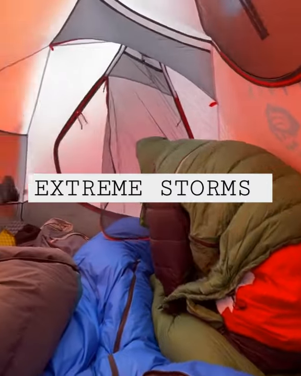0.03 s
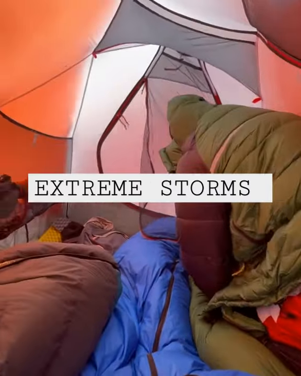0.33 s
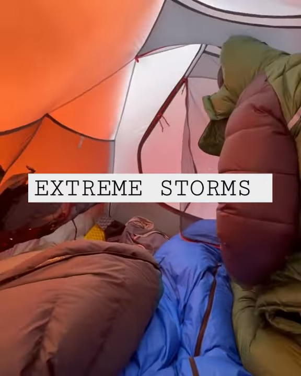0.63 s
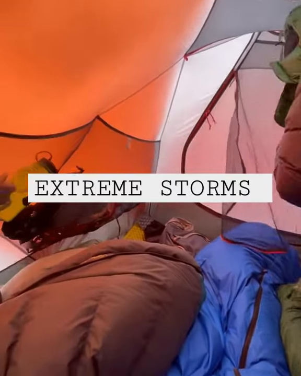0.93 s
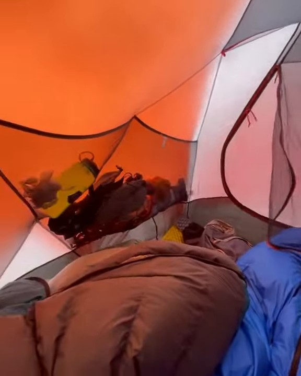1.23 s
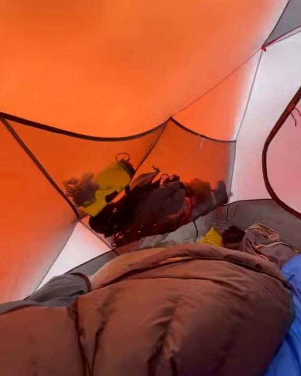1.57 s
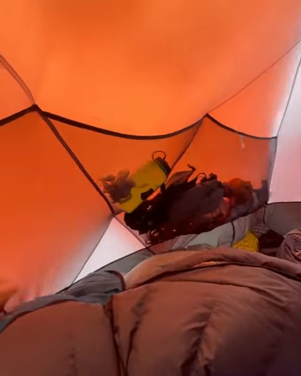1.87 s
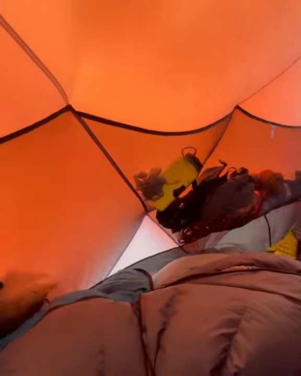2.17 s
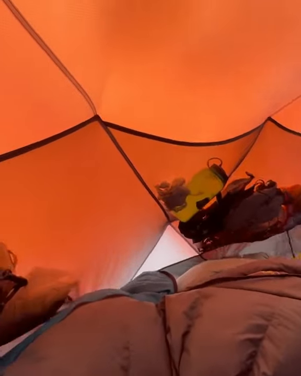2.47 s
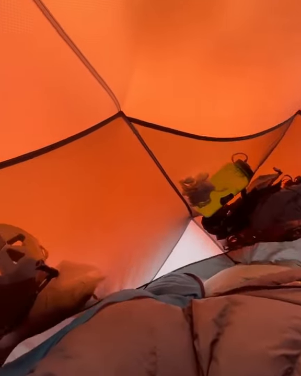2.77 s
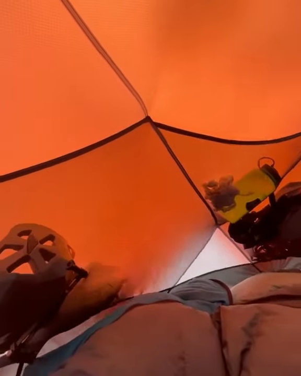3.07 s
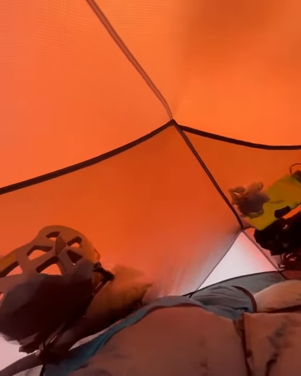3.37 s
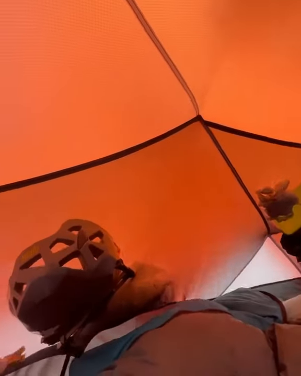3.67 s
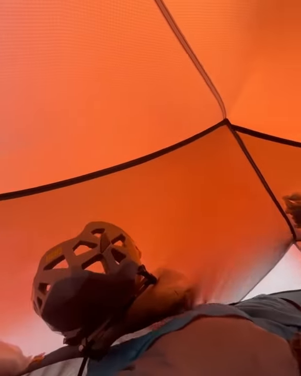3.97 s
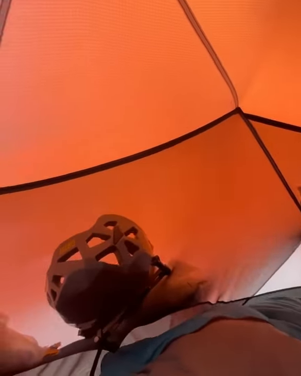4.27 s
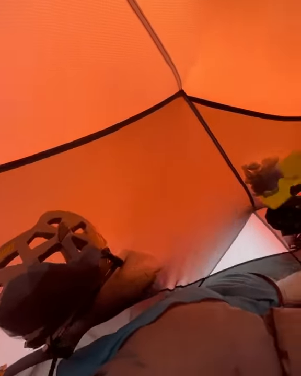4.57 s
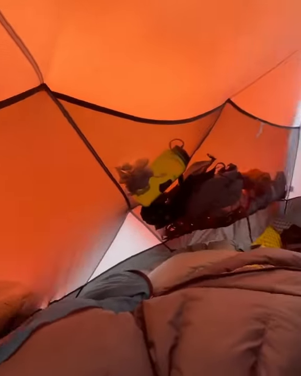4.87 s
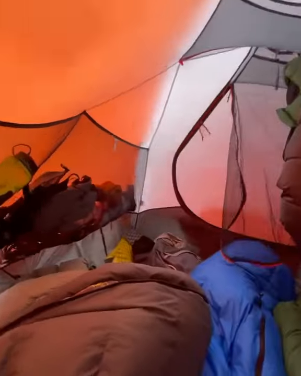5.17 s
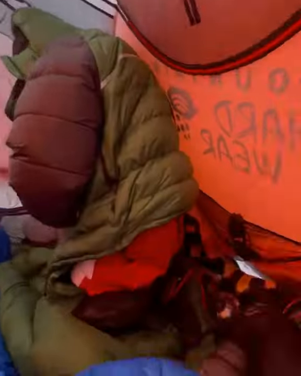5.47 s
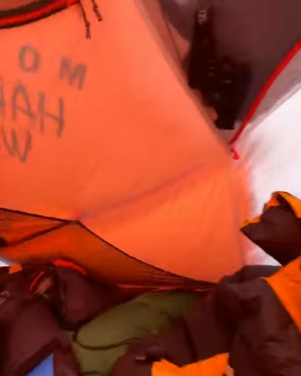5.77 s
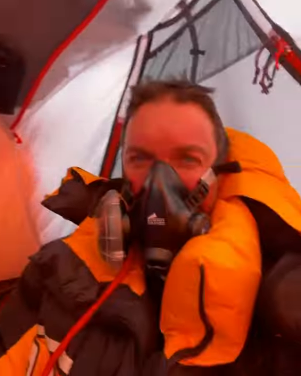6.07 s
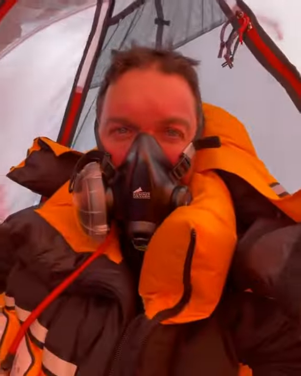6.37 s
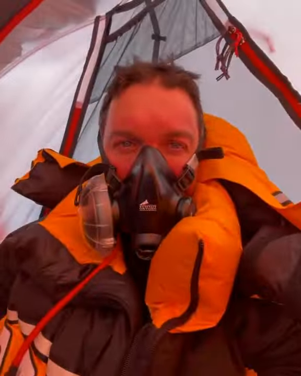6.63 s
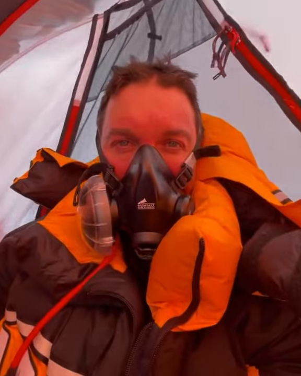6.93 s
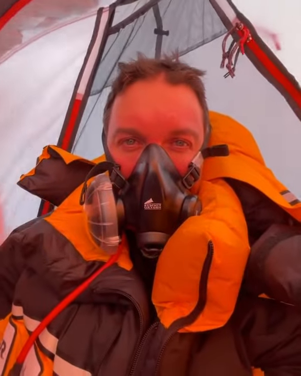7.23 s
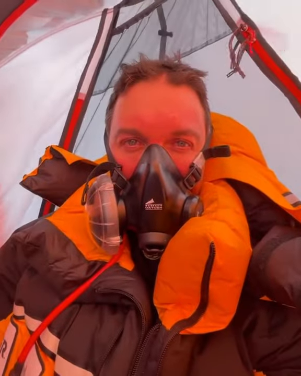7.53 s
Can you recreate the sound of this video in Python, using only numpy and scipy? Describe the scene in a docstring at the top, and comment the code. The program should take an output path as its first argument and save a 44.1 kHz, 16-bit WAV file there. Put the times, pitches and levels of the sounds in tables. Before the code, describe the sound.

Strong wind batters a small nylon tent in a mountain storm, heard from inside on a hand-held phone. A low, uneven throb runs throughout as the walls drum and slap. The loose outer sheet rattles, snaps and crinkles, and blown snow and ice hiss over it. A zip pull ticks briefly early on. The slaps are strongest in the middle, and the sound softens slightly near the end.

```python
"""Inside a small nylon tent in a mountain storm, heard on a hand-held phone.
Gusts heave the walls and pump the enclosed air into a low throb; the panels drum and slap.
The loose fly rattles, snaps and crinkles as its folds buckle; blown snow and ice hiss over the cloth.
A zip pull chatters once. Near the end the phone turns away from the windward wall."""
import sys
import numpy as np
from scipy import signal
from scipy.fft import rfft, irfft
from scipy.io import wavfile
from scipy.ndimage import uniform_filter1d

SR = 44100
rng = np.random.default_rng(int(sys.argv[2]) if len(sys.argv) > 2 else 0)


def to_wav(sig):
    """Store sig (one row per channel, or 1-D mono) as 16-bit WAV at the path in sys.argv[1].

    Samples outside -1..1 are clipped; the rate is SR.
    """
    pcm = np.clip(np.atleast_2d(sig), -1, 1) * 32767
    pcm = np.round(pcm).astype(np.int16)
    wavfile.write(sys.argv[1], SR, pcm.T)  # frames by channels


N = 343980
TIME = np.arange(N) / SR
GUST_RISE_S, GUST_FALL_S = 0.009, 0.031

# buckling fold: (frequency / centre [ratio], level [dB])
FOLD_SHAPE = [(.1, -55), (.45, 4), (1, -4), (1.5, -13.5), (2.1, -20.5), (3, -20), (8, -47)]
# coarse ice grains: (frequency [Hz], level [dB])
ICE_SPECTRUM = [(3000, -56), (6500, 7.5), (8500, 8.5), (10500, 6), (13000, 7)]


def throb(push_db, base_db=-15.5, follow=0.46):
    """The walls heave and stall, pumping the enclosed air in separate buffets."""
    # enclosed air: (frequency [Hz], level [dB])
    spectrum = [(15, -27), (25, -24), (32, -19.5), (42, -6), (55, -4), (68, -0.5), (85, -5.5), (110, -9),
                (150, -14.5), (250, -35), (500, -83.5)]
    # walls squeeze the air: (time [s], level change [dB])
    heaves = [(0.095, 0), (0.92, 2.5), (1.037, 7), (1.137, 4), (1.319, 8), (1.846, 3.5), (2.012, 4.5),
              (2.341, 2.5), (2.473, 4), (2.763, 6), (2.875, 7), (3.205, 7.5), (3.663, 2.5), (3.77, -3),
              (3.98, 5), (4.213, -1), (4.513, 4.5), (4.635, 1), (4.889, 4), (5.209, 4), (5.293, 0.5),
              (5.547, 1.5), (5.696, 1), (5.834, 4.5), (6.163, 2.5), (6.381, 4.5), (6.534, 5), (6.619, 4.5),
              (6.795, 3.5), (6.937, 1), (7.08, 2.5), (7.266, 3), (7.352, 5.5), (7.478, 4), (7.694, 5)]
    # walls stall: (time [s], level change [dB])
    stalls = [(0.02, -6), (0.65, -6), (0.98, -7), (1.92, 0), (2.06, -3), (2.3, -6), (2.55, -3), (2.92, -6),
              (3.25, -12), (3.72, -11), (4.47, -6), (5.4, -9), (5.89, -8), (6.02, -11), (6.1, -1),
              (6.2, -1), (6.33, 2), (6.44, -3), (6.5, -9), (6.68, -7), (6.86, -15), (7.31, -11), (7.43, -4),
              (7.61, -2)]
    air = coloured(rng.standard_normal((2, N)), spectrum)
    level_db = base_db + follow * push_db + bumps(heaves, width_s=0.016) + bumps(stalls, width_s=0.022)
    return gain_of(level_db) * np.vstack([steadied(side[None], window_s=0.125) for side in air])


def panels(push_db, flog, base_db=-16.0, follow=0.96):
    """Taut wall panels drum under dense blows of turbulent air."""
    # wall panel: (frequency [Hz], level [dB])
    spectrum = [(50, -27.5), (100, -4), (150, -1), (240, 0.5), (310, -2.5), (400, -2.5), (500, -4.5),
                (620, -9), (760, -10), (1000, -19.5), (1500, -25.5), (3000, -42), (8000, -93)]
    blows = ticks(per_s=3500, spread_db=2.0) * (1 + 0.23 * flog)
    drum = np.vstack([steadied(side[None], window_s=0.1) for side in coloured(blows, spectrum)])
    return gain_of(base_db + follow * push_db) * drum


def panel_slaps(base_db=-8.5):
    """A whole panel pulls taut with a dull slap."""
    # slaps: (time [s], relative level [dB], centre [Hz])
    slaps = [(0.113, -6, 358), (0.233, -2.5, 303), (0.661, -8, 300), (0.858, -4, 420), (0.87, -4, 378),
             (0.889, -3, 350), (0.957, -5, 440), (1.331, -9, 358), (1.506, -5, 350), (1.906, -7, 380),
             (1.951, -5, 370), (2.012, -5, 396), (2.056, -11, 520), (2.71, -1, 338), (2.758, -0.5, 370),
             (2.906, -4.5, 328), (3.115, 0, 332), (3.197, -5, 480), (3.268, -1, 340), (3.561, 0, 362),
             (3.62, -12, 540), (3.662, -1, 340), (3.91, -7, 382), (4.067, -0.5, 420), (4.45, 0, 400),
             (4.523, -1, 318), (4.579, 0, 416), (4.6, -2.5, 400), (4.623, 0.5, 335), (4.851, -2.5, 390),
             (4.933, -9, 435), (5.246, -5, 420), (5.332, -6, 340), (5.437, 2, 378), (5.452, -4, 446),
             (5.52, -14, 540), (5.617, -3, 270), (6.002, -8, 310), (6.504, -7, 500), (6.545, -6.5, 410),
             (6.709, -13, 342), (6.719, -10.5, 398), (7.036, -8.5, 260), (7.068, -11, 335),
             (7.268, -2, 363), (7.298, -7, 418), (7.444, -10, 380), (7.47, -7, 523)]
    # slapping panel: (frequency / centre [ratio], level [dB])
    shape = [(.16, -32), (.4, -7.5), (.92, 2.5), (1.45, -4.5), (2.3, -11.5), (4.2, -29), (10, -36),
             (26, -63)]
    out = np.zeros((2, N))
    for start_s, level_db, hz in slaps:
        slap = burst(pitched(shape, hz), rise_s=0.00041, fall_s=0.013, jerk=0.45)
        add(out, start_s, gain_of(base_db + level_db) * slap)
    return out


def fly_snaps(base_db=-2.0, rise_s=0.0003):
    """The fly cracks taut and sheds ice; each snap carries a brief narrow ring. A few low-pitched rows give the
    crisp crack of a panel slap instead."""
    # snaps: (time [s], relative level [dB], centre [Hz], ice share [dB], decay [s], ring pitch [Hz], ring share
    # [dB]); rows centred near 1.2 kHz or lower are the crisp crack of a panel slap
    snaps = [(0.641, -20, 2200, -24, .005, 2600, -8), (0.701, -21.5, 2200, -22, 0.0054, 2600, -5),
             (0.858, -14, 1200, -28, .005, 800, -5), (0.957, -16, 1200, -26, 0.0044, 800, -3),
             (1.063, -23, 2400, -17, .005, 2600, -2), (1.251, -23, 2600, -18, 0.0066, 2600, -4),
             (1.329, -20, 2400, -18, .005, 2600, -5), (1.453, -21, 2200, -20, .006, 2700, -2),
             (1.503, -15, 2000, -13, .0058, 2450, -5), (1.552, -17.5, 3400, -5, 0.0063, 6200, -10),
             (1.591, -20, 1800, -22, .005, 2600, 0), (1.672, -27, 2600, -20, .007, 3300, -5),
             (1.695, -21, 2400, -22, .005, 2700, -4), (1.719, -20, 3000, -20, .004, 2600, -4),
             (1.746, -24, 3000, -3, .0079, 2700, -4), (1.945, -22, 4020, -1, .011, 5800, -4),
             (2.056, -28, 1400, -26, .004, 900, -7), (2.104, -20, 2210, -4, .0085, 2550, -2),
             (2.121, -20, 2200, -17, 0.0073, 2650, -6), (2.14, -21, 2230, -19, .014, 2600, 0),
             (2.213, -12.5, 1300, -25, .0062, 2550, -13), (2.266, -18, 1800, -13, .0076, 2600, -8),
             (3.113, -19, 2200, -24, .0051, 2600, -2), (3.197, -15.5, 2200, -26, .005, 3180, -6),
             (3.247, -20, 1900, -21, 0.0066, 2550, -7), (3.532, -26, 3200, -17, .016, 2820, 5),
             (3.547, -21, 1900, -18, .007, 3400, -8), (3.621, -20, 1200, -28, .004, 800, -3),
             (3.76, -22.5, 2000, -24, .007, 2600, -1), (3.795, -19, 2400, -9, .01, 6300, -12),
             (4.447, -23, 1700, -24, .005, 2600, -4), (4.48, -13.5, 1740, -16, .004, 1950, -2),
             (4.528, -15, 1700, -20, .006, 2600, -6), (4.577, -16.5, 2780, -24, 0.0084, 2900, -5),
             (4.622, -14, 1300, -28, .006, 2600, -13), (5.097, -15.5, 2970, -23, 0.0053, 5500, -8),
             (5.245, -19.5, 2200, -18, 0.02, 3200, -6), (5.25, -13, 1700, -24, 0.0032, 2600, -8),
             (5.332, -17, 1500, -21, 0.0053, 1050, -4), (5.437, -22, 1200, -28, 0.0046, 695, -10),
             (5.52, -21, 1300, -26, .004, 800, -3), (5.752, -20, 2380, -22, 0.0094, 2600, -9),
             (5.831, -17, 1490, -11, .0068, 2670, -6), (5.946, -19, 2000, -24, .005, 2600, -11),
             (6.062, -32, 5500, -14, .0051, 6200, 3), (6.302, -20, 1700, -24, 0.0073, 2600, -11),
             (6.504, -18, 1000, -28, 0.0043, 795, -3), (6.518, -23, 1700, -24, .006, 2600, -5),
             (6.545, -14, 1900, -28, 0.0032, 3080, -2.5), (6.72, -22, 2400, -26, .0045, 2720, -2),
             (7.135, -22, 3400, -21, .01, 2600, -2), (7.409, -19.5, 3400, -18, 0.006, 3870, 0),
             (7.417, -24, 3400, -22, .004, 4000, -4), (7.444, -29, 2800, -24, 0.0055, 3300, -7),
             (7.471, -20, 1300, -23, .006, 800, -8), (7.481, -24.5, 2600, -22, .006, 2700, -7),
             (7.684, -19.5, 2200, -25, 0.0068, 2600, -5)]
    # narrow ring, mostly the phone microphone's resonance near 2.6 kHz:
    # (frequency / pitch [ratio], level [dB])
    ring_shape = [(.2, -61), (.6, -19), (.86, -9), (1, 1), (1.16, -11.5), (1.6, -27), (5, -42)]
    out = np.zeros((2, N))
    for start_s, level_db, hz, ice_db, fall_s, ring_hz, ring_db in snaps:
        crack = burst(pitched(FOLD_SHAPE, hz), rise_s, fall_s, jerk=0.55)
        shed_ice = gain_of(ice_db) * burst(ICE_SPECTRUM, rise_s=0.0006, fall_s=fall_s)
        ring = gain_of(ring_db) * burst(pitched(ring_shape, ring_hz), rise_s, fall_s, jerk=0.55)
        add(out, start_s, gain_of(base_db + level_db) * (crack + shed_ice + ring))
    return out


def fly_rattle(shake_db, flog, base_db=-28.5):
    """Creases of the outer sheet buckle, harder with each whip."""
    # rattling fly: (frequency [Hz], level [dB])
    spectrum = [(300, -39.5), (700, 3), (1050, 1.5), (1400, -1), (1950, -5), (2480, 0.5), (2900, -4.5),
                (3400, -10), (4300, -16.5), (6000, -21.5), (9000, -21), (13000, -60)]
    creases = ticks(per_s=5000, spread_db=0.5) * (1 + 0.25 * flog)
    creases = patchy(creases, depth_db=2.0, patch_cells=5)
    return gain_of(base_db + shake_db) * steadied(coloured(creases, spectrum), window_s=0.99)


def fly_crinkles(shake_db, drift_db, base_db=-36.0):
    """Folds of many sizes pop singly, louder when the fly flutters or snow loads it."""
    # bouts of flutter: (start [s], length [s], level change [dB])
    flutters = [(1.23, 0.12, -2), (1.42, 0.32, 2), (2.08, 0.1, -1), (4.2, 0.18, 3), (4.42, 0.2, 6.5)]
    pops = np.zeros((2, N))
    for hz in np.geomspace(1300, 5000, 8):
        pop = burst(pitched(FOLD_SHAPE, hz), rise_s=0.0003, fall_s=0.0042, jerk=0.3)
        triggers = ticks(per_s=32, spread_db=0.5)[:1]
        pops += signal.oaconvolve(triggers, pop, axes=1)[:, :N] / hz ** 0.87
    flutter_db, = swells(flutters, GUST_RISE_S, GUST_FALL_S)
    return gain_of(base_db + shake_db + 0.35 * drift_db + flutter_db) * unit_rms(pops)


def snow(load_db, flog, base_db=-38.5):
    """Fine snow scours the nylon, a little harder with each whip."""
    # snow on nylon: (frequency [Hz], level [dB])
    spectrum = [(1000, -24), (2500, 1.5), (3600, 2.5), (4600, -0.5), (6000, 2), (8000, -7), (10000, -8),
                (13000, -32)]
    grains = ticks(per_s=14000, spread_db=-1.0) * (1 + 0.1 * flog)
    grains = patchy(grains, depth_db=2.0, patch_cells=9)
    return gain_of(base_db + load_db) * steadied(coloured(grains, spectrum), window_s=1.0)


def ice(load_db, base_db=-45.3, flurry_db=4.0, flurry_hz=12):
    """Coarse grains spatter on the fly in uneven flurries."""
    grains = patchy(ticks(per_s=6000, spread_db=2.9), depth_db=1.5, patch_cells=7)
    level_db = base_db + load_db + flurry_db * wander(flurry_hz)
    return gain_of(level_db) * steadied(coloured(grains, ICE_SPECTRUM), window_s=0.3)


def zip_pull():
    """A small metal pull rings with a few quick taps close to the phone."""
    # taps: (time [s], level [dB])
    taps = [(1.5524, -23), (1.553, -24), (1.5546, -20), (1.556, -26), (1.5594, -39)]
    # metal modes: (frequency [Hz], level [dB], t60 [s])
    modes = [(5900, -5, .009), (13030, -10, 0.0054)]
    t = np.arange(SR // 50) / SR
    ring = sum(gain_of(db - 60 * t / t60_s) * np.sin(2 * np.pi * hz * t) for hz, db, t60_s in modes)
    out = np.zeros((2, N))
    for start_s, level_db in taps:
        add(out, start_s, gain_of(level_db) * np.array([ring, ring]))
    return out


def flogging(rate_hz=51.46, unevenness=0.5, rise_s=0.01, fall_s=0.0058, spread_db=1.0):
    """Envelope of loose cloth: waves reach its edge at an uneven rate, each ending in a whip."""
    cycles = np.cumsum(rate_hz * np.exp(unevenness * wander(rate_hz))) / SR
    strength = gain_of(spread_db * np.clip(rng.standard_normal(N), -2, 2))
    whips = np.diff(np.floor(cycles), prepend=0) * strength
    return unit_rms(signal.oaconvolve(whips, pulse(SR // 10, rise_s, fall_s))[:N])


def phone_ports(x):
    """Two signals become the sound at a turning phone's two ports: alike in bass, apart in treble."""
    # facing the wall: (frequency [Hz], coherence [0-1], left lead [rad], left minus right [dB])
    facing = [(90, 0.998, 0.0, 0.1), (200, 0.986, 0.2, 2.7), (350, 0.965, 0.1, 5.8), (480, 0.82, 0.1, 9.3),
              (620, 0.51, -0.6, 9.5), (880, 0.53, -1.2, 4.8), (1100, 0.58, -0.6, 1.5),
              (1550, 0.81, 0.05, 0.7), (1900, 0.56, 0.8, 0.2), (2080, 0.27, 1.7, 0.0),
              (2240, 0.55, 3.0, 0.3), (2430, 0.85, 3.15, 0.6), (2600, 0.89, 3.2, 0.7),
              (2770, 0.7, 3.3, 0.8), (2930, 0.32, 3.9, 0.7), (3400, 0.12, 4.8, 0.6), (4100, 0.5, 6.4, 0.1),
              (4700, 0.08, 6.9, 0.0), (5200, 0.04, 7.2, 0.0), (6400, 0.29, 6.9, -0.2),
              (7600, 0.27, 8.8, -0.3), (9000, 0.55, 9.2, -0.4), (12000, 0.52, 9.6, 0.4)]
    # turned away: same columns
    away = [(90, 0.999, 0.0, 0.2), (330, 0.957, -0.1, 2.9), (500, 0.82, -0.5, 6.5), (800, 0.74, -1.2, 3.2),
            (1250, 0.51, -1.0, -1.3), (1900, 0.49, -0.8, 1.1), (2500, 0.54, -1.9, 0.3),
            (3300, 0.08, -1.5, -1.1), (4100, 0.38, 0.3, -1.0), (5200, 0.07, -0.2, -0.6),
            (9000, 0.24, 2.7, -0.4), (12000, 0.36, 3.3, 0.1)]
    # phone's pose: (time [s], turn [0 facing - 1 away])
    poses = [(0, 0.2), (1.2, 0.37), (2.5, 0.019), (4.55, 0.033), (5.0, 0.19), (5.67, 0.8), (7.8, 1)]
    # shading by its body when turned away: (frequency [Hz], gain [dB])
    shading = [(100, 0), (170, 0.5), (330, -2), (520, -1), (800, 0.5), (1600, -2.5), (2600, -4),
               (4100, -1.1), (8000, -3.5), (12500, -5)]
    hz, t, (left, other) = signal.stft(x, SR, nperseg=1024, noverlap=768)
    turn = np.clip(np.interp(t, *np.transpose(poses)), 0, 1)
    coherence, left_db = 0, 0
    for table, weight in (facing, 1 - turn), (away, turn):
        likeness, lead_rad, balance_db = columns_at(table, hz)
        coherence += np.outer(np.clip(likeness, 0, 1) * np.exp(-1j * lead_rad), weight)
        left_db += np.outer(balance_db, weight)
    right = coherence * left + np.sqrt(np.maximum(1 - abs(coherence) ** 2, 0)) * other
    ratio = gain_of(left_db)
    pair = np.array([ratio * left, right]) * np.sqrt(2 / (1 + ratio ** 2))
    shade = gain_of(np.outer(columns_at(shading, hz)[0], turn))
    return signal.istft(pair * shade, SR, nperseg=1024, noverlap=768)[1][:, :N]


def burst(spectrum, rise_s, fall_s, jerk=0):
    """An optional opening jerk, then a quick run of tiny blows that dies away."""
    envelope = pulse(SR // 8, rise_s, fall_s)
    envelope[0] = jerk * np.linalg.norm(envelope)
    sound = coloured(rng.choice([-1., 1.], (2, len(envelope))) * envelope, spectrum)
    return sound * np.linalg.norm(envelope) / np.linalg.norm(sound, axis=1, keepdims=True)


def ticks(per_s, spread_db):
    """Two trains of random blows of uneven size, rms 1."""
    size = gain_of(spread_db * np.minimum(rng.exponential(1, (2, N)), 4))
    return unit_rms(size * rng.choice([-1, 1], (2, N)) * (rng.random((2, N)) < per_s / SR))


def patchy(x, depth_db, patch_cells):
    """Each band swells and fades by itself, in slow patches."""
    cells = signal.stft(x, SR, nperseg=256)[2]
    field = rng.standard_normal(cells.shape[1:])
    for _ in range(2):
        field = uniform_filter1d(uniform_filter1d(field, patch_cells, 0), patch_cells, 1)
    return signal.istft(cells * gain_of(depth_db * unit_rms(field)), SR, nperseg=256)[1][:, :N]


def coloured(x, spectrum, size=4096):
    """Minimum-phase filter: each blow starts sharply and rings out with this spectrum."""
    level_db, = columns_at(spectrum, abs(np.fft.fftfreq(size, 1 / SR)))
    response = np.exp(np.conj(signal.hilbert(np.log(gain_of(level_db)))))
    ring = np.fft.ifft(response).real[:size // 2]
    return signal.oaconvolve(x, ring[None], axes=1)[:, :x.shape[1]]


def steadied(x, window_s):
    """Holds rms near 1 over the window; faster flutter stays."""
    window = signal.windows.hann(int(window_s * SR))
    energy = signal.fftconvolve((x ** 2).mean(0), window, "same")
    power = energy / signal.fftconvolve(np.ones(N), window, "same")
    return x / np.sqrt(abs(power) + 1e-20)


def wander(cutoff_hz):
    """Slow random curve, rms 1."""
    hz = np.fft.rfftfreq(N, 1 / SR)
    return unit_rms(irfft(rfft(rng.standard_normal(N)) / (1 + (hz / cutoff_hz) ** 4), N))


def swells(rows, rise_s, fall_s):
    """Each row rises, holds and falls; one dB curve per level column."""
    start_s, length_s, *levels_db = np.transpose(rows)
    age_s = TIME - start_s[:, None]
    shape = np.clip(np.minimum(age_s / rise_s, 1 - (age_s - length_s[:, None]) / fall_s), 0, 1)
    return np.array(levels_db) @ shape


def bumps(rows, width_s):
    """A Gaussian rise or dip in dB around each time."""
    return sum(db * np.exp(-((TIME - centre_s) / width_s) ** 2) for centre_s, db in rows)


def pulse(samples, rise_s, fall_s):
    t = np.arange(samples) / SR
    return (1 - np.exp(-t / rise_s)) * np.exp(-t / fall_s)


def pitched(shape, centre_hz):
    """Moves a spectral shape to a centre pitch."""
    return [(centre_hz * ratio, db) for ratio, db in shape]


def columns_at(table, hz):
    """Interpolates each column over log frequency."""
    table_hz, *columns = np.transpose(table)
    return [np.interp(np.log(hz + 1), np.log(table_hz + 1), column) for column in columns]


def add(mix, start_s, sound):
    part = mix[:, round(start_s * SR):][:, :sound.shape[1]]
    part += sound[:, :part.shape[1]]


def gain_of(db):
    return 10 ** (np.asarray(db) / 20)


def unit_rms(x):
    return x / np.sqrt(np.mean(x ** 2) + 1e-20)


def scene():
    """Wind and gusts load the tent; one flogging motion runs through panels, fly and snow."""
    # wind between gusts: (time [s], relative level [dB])
    wind = [(0, -1.7), (0.35, -2.5), (0.6, -5.5), (1.05, -0.1), (1.75, 0.7), (2.25, 1), (2.6, 0.0),
            (3.45, 0.5), (4.0, -0.5), (4.45, 2.5), (4.75, -1), (5.1, -2), (5.7, -3), (6.15, -5.5),
            (6.5, -2.5), (6.85, -5), (7.1, -4.5), (7.8, -4)]
    # snow carried by the wind: (time [s], relative load [dB])
    drift = [(0, 0), (0.6, -3), (1.1, 1.5), (1.6, 2), (2.13, 6), (2.24, 2.5), (2.45, 0), (3.0, 3.5),
             (3.448, -1.2), (4.4, -1.5), (4.75, -3), (5.35, 0.5), (5.95, -3), (6.45, 0.5), (7.2, -2),
             (7.8, 0.5)]
    # gusts: (start [s], length [s], push on panels [dB], shake of fly [dB])
    gusts = [(0.13, 0.23, 2, 3.5), (0.84, 0.17, 2.5, 1), (1.23, 0.092, -0.5, 4.5), (1.42, 0.054, -1.5, 0),
             (1.49, 0.32, -1.5, 2), (1.88, 0.084, 0.5, 2), (2.08, 0.22, -0.5, 1.5), (2.75, 0.17, 0.5, 3),
             (3.19, 0.14, 1.5, 1), (3.52, 0.031, 4, 3), (3.65, 0.32, 1, 3.5), (4.2, 0.067, 0.5, 3.5),
             (4.4, 0.24, 0, 3.5), (4.83, 0.15, 1, 1.5), (5.16, 0.218, 4, 2.5), (5.42, 0.12, 1, 2.5),
             (6.275, 0.03, -2.5, 3), (6.5, 0.12, 1, 3), (6.69, 0.036, 1, 3), (7.02, 0.15, 3.5, 2.5),
             (7.258, 0.034, 1.5, 4.5), (7.345, 0.13, 1, 4)]
    # drift thrown on the fly: (start [s], length [s], snow [dB], ice [dB])
    spurts = [(0.29, 0.12, 3, 2), (1.04, 0.034, 3.5, 6), (1.235, 0.081, 2.5, 6), (1.41, 0.06, 1.5, -2),
              (1.545, 0.022, 4, 5), (1.94, 0.092, 1.5, -3), (2.095, 0.06, 6, -5), (3.515, 0.031, 9.5, -2),
              (3.635, 0.04, 5.5, -4), (3.7, 0.22, 3.5, 5.5), (3.76, 0.055, 1.5, 2), (4.555, 0.031, 12, -7),
              (5.19, 0.074, 5, -3), (7.27, 0.082, 3.5, 2), (7.37, 0.13, 3.5, -4)]
    # instants of slack cloth, and a few slight lifts: (time [s], level change [dB])
    lulls = [(0.42, 0.5), (1.39, -1), (2.045, -5.5), (3.595, -0.5), (2.56, -0.5), (2.95, -1), (3.42, 0),
             (4.02, 2), (4.72, 0.5), (5.41, 1), (6.47, 1), (6.66, -0.5), (6.8, -5), (7.22, -1.5),
             (7.62, -0.5)]
    wind_db, drift_db = (np.interp(TIME, *np.transpose(curve)) for curve in (wind, drift))
    gust_push_db, gust_shake_db = swells(gusts, GUST_RISE_S, GUST_FALL_S)
    spurt_snow_db, spurt_ice_db = swells(spurts, rise_s=0.031, fall_s=0.0092)
    eddy_db = 0.6 * wander(cutoff_hz=29)  # small eddies move the whole tent together
    waver_db = bumps(lulls, width_s=0.013) + eddy_db
    jolt_db = gust_shake_db + waver_db
    push_db = wind_db + gust_push_db + waver_db
    shake_db = 0.39 * wind_db + 0.34 * drift_db + jolt_db
    flog = flogging()
    cloth = panels(push_db, flog) + fly_rattle(shake_db, flog) + fly_crinkles(shake_db, drift_db)
    flaps = fly_snaps() + panel_slaps()
    hiss = snow(1.04 * drift_db + 0.88 * jolt_db + spurt_snow_db, flog)
    spatter = ice(drift_db + 0.58 * jolt_db + spurt_ice_db)
    return phone_ports(throb(push_db) + cloth + flaps + hiss + spatter) + zip_pull()


def record(dry, cutoff_hz=13200):
    """Soft clip, then low-pass."""
    rounded = dry / (1 + dry ** 6) ** (1 / 6)
    kernel = signal.firwin(511, cutoff_hz, window=("kaiser", 9), fs=SR)
    return signal.oaconvolve(rounded, kernel[None], "same")


dry = scene()
out = record(dry)
to_wav(out)
```